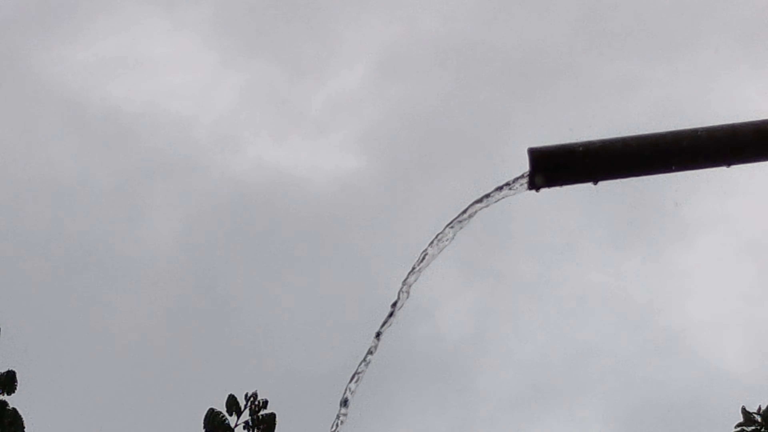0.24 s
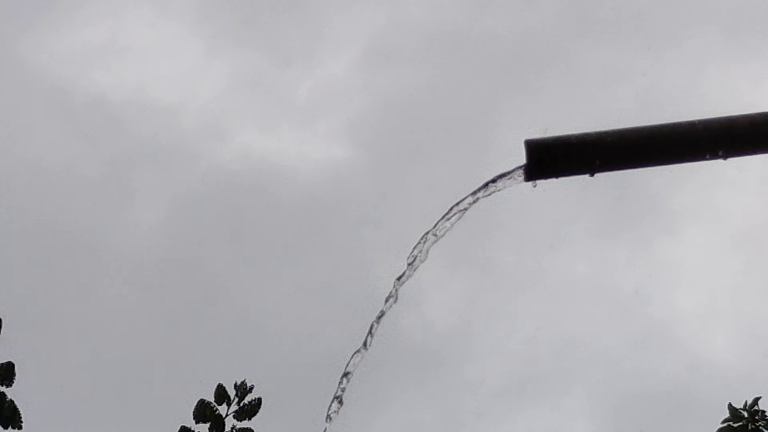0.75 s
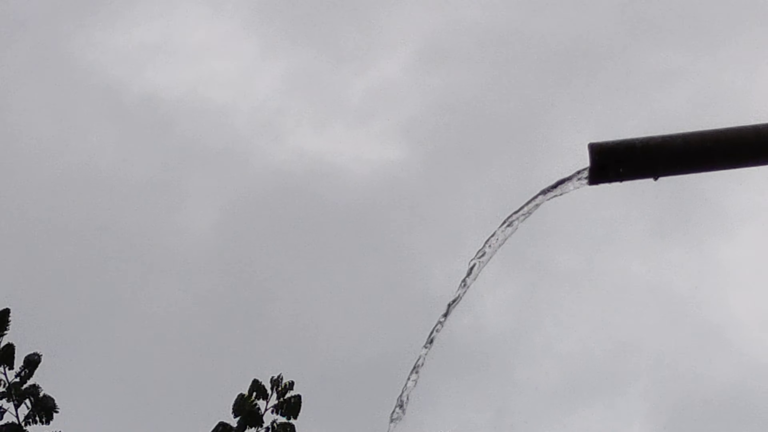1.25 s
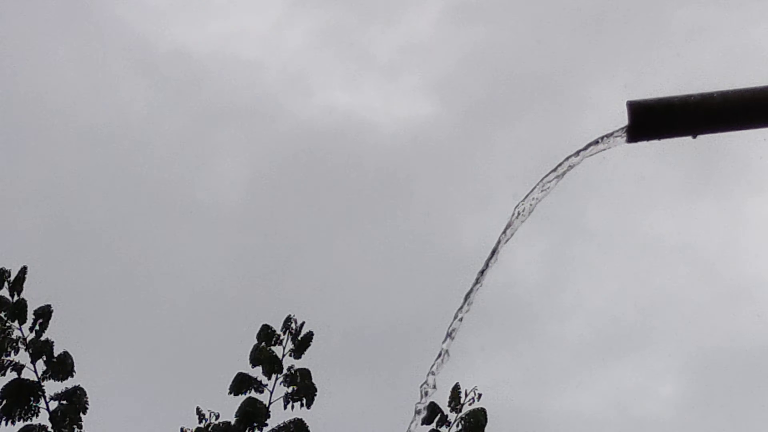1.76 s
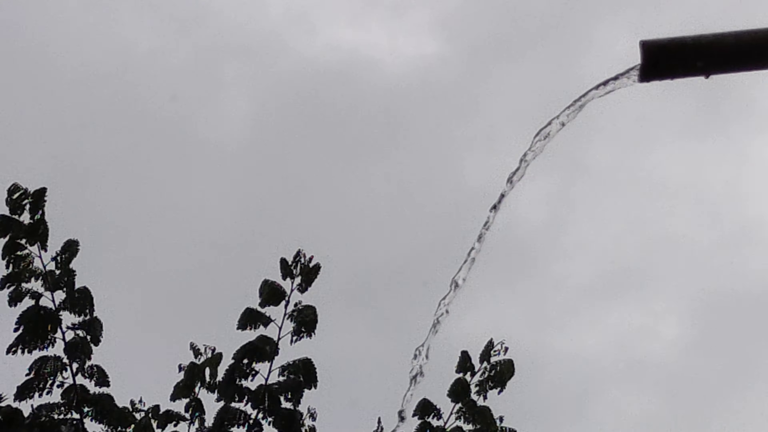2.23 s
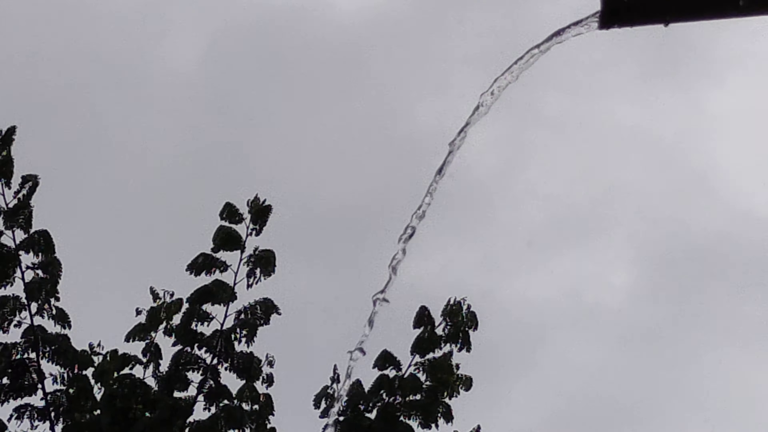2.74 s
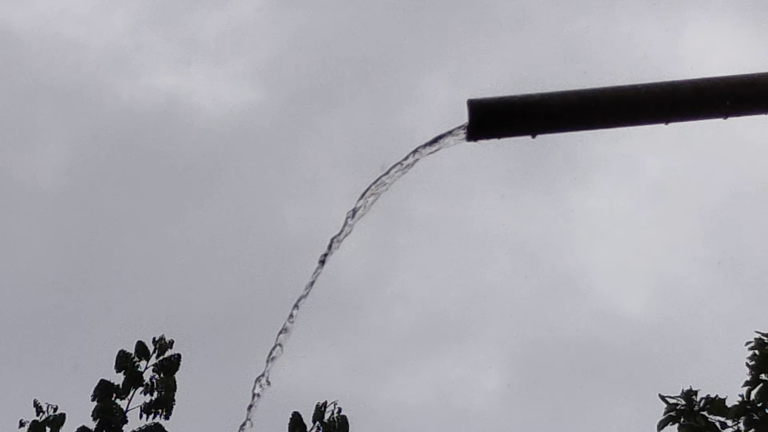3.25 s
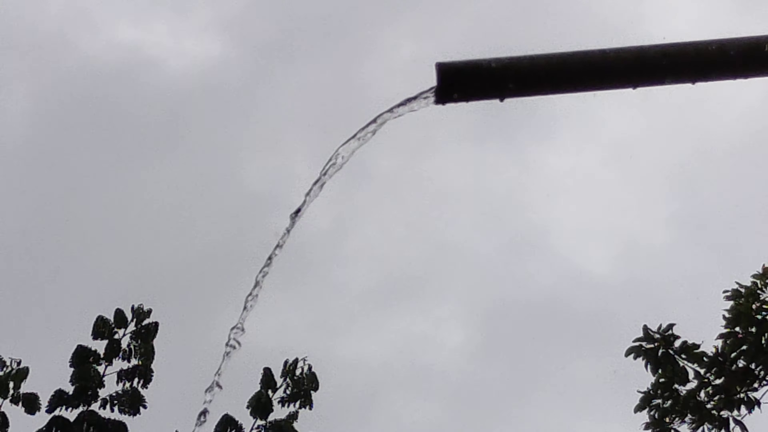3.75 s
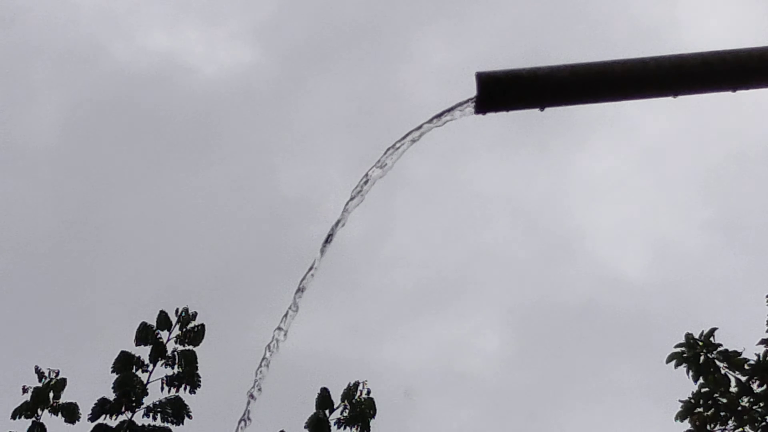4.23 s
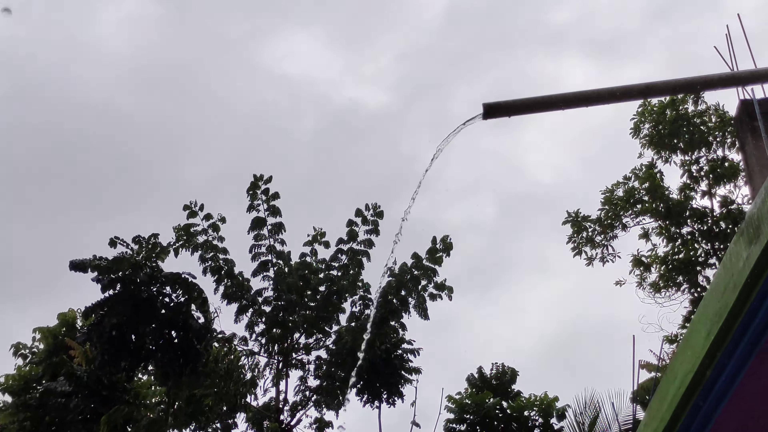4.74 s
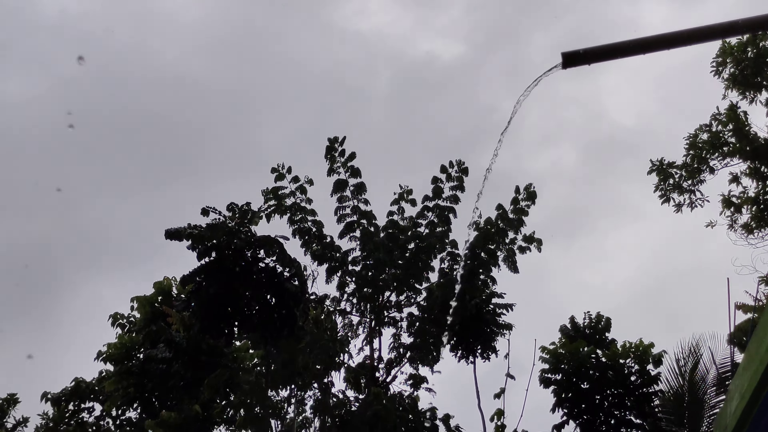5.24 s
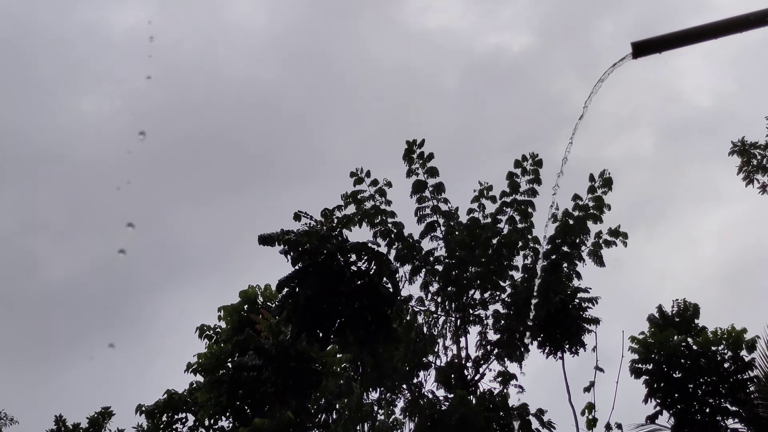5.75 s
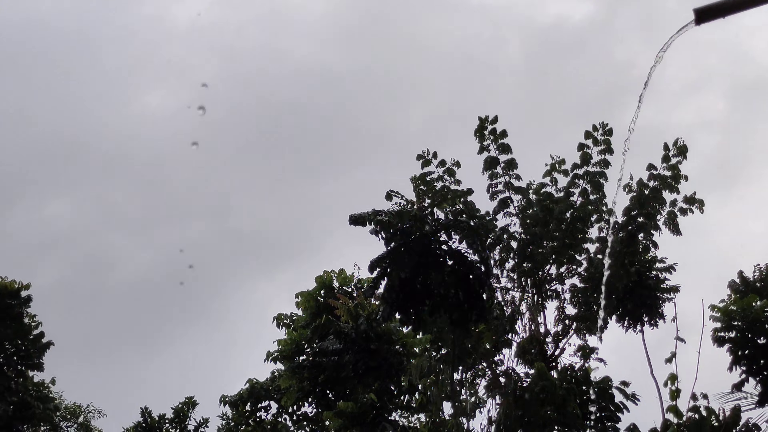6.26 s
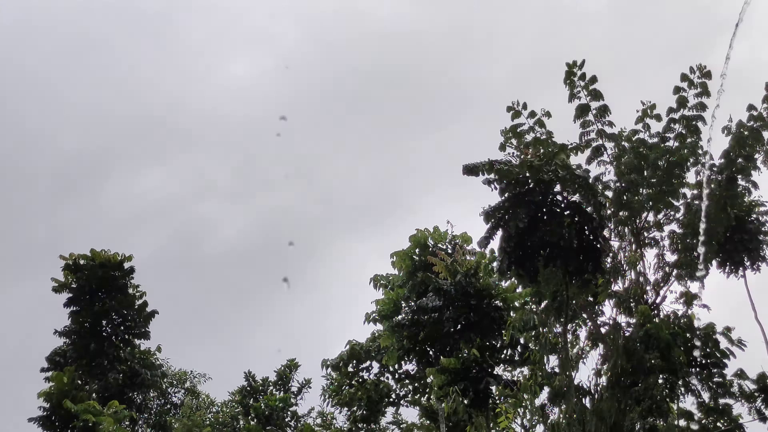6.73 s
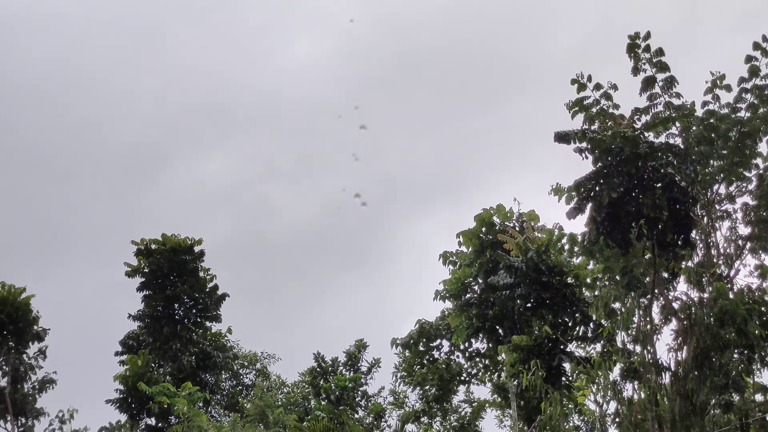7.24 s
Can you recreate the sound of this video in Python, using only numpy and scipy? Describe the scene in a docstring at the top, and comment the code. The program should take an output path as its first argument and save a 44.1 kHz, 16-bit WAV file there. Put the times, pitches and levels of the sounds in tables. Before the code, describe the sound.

Wet drops smack and patter on leaves beside a pouring drain, growing denser, with plopping puddles, dull drumming drips and a late falling bird whistle.

```python
"""Steady rain in a garden beside a house: from the start, bursts of band-limited noise and short wave packets
give drops smacking on leaves and wet ground, while a roof drain pours and spatters.
Fat drips soon plop into puddles as ringing air bubbles, and the pool gurgles, splashes and bubbles.
From halfway, runs of drips drum on a taut cover overhead (perhaps an umbrella), each a rounded push.
Near the end a bird gives one long falling whistle, a swept sine. The house wall throws back short echoes."""
import sys
import numpy as np
from scipy import signal
from scipy.fft import rfft, irfft
from scipy.io import wavfile
from scipy.ndimage import uniform_filter1d

SR = 44100
rng = np.random.default_rng(int(sys.argv[2]) if len(sys.argv) > 2 else 0)


def store_wav(level_fs):
    """Save 16-bit WAV to argv[1]."""
    pcm = np.round(np.clip(np.atleast_2d(level_fs), -1, 1) * 32767)
    wavfile.write(sys.argv[1], SR, pcm.T.astype(np.int16))


N = 330292
TIME = np.arange(N) / SR

# fine rain on the leaves, before mixing: (time [s], relative level [dB])
RAIN_LEVEL = [(0.0, -39), (0.16, -54), (0.31, -62), (0.73, -39), (0.96, -52), (1.11, -49), (1.31, -51),
              (1.4, -46), (2.13, -35), (2.27, -31), (2.9, -36.5), (4.07, -35), (4.9, -37), (5.09, -36.5),
              (5.25, -37), (5.59, -37), (5.74, -48), (6.01, -46), (6.32, -38.5), (6.53, -41.5), (6.74, -47),
              (6.92, -36.5), (7.2, -43), (7.49, -39)]
# centre pitch of the rain at the start [Hz] and its steady fall [Hz per s]
RAIN_HZ, RAIN_SAG_HZ_PER_S = 3298, 96
# spray of the drain, before mixing: (time [s], relative level [dB])
SPRAY_LEVEL = [(0.0, -71.5), (0.31, -64.5), (0.58, -65), (0.77, -54.5), (0.98, -67.5), (1.15, -55),
               (1.79, -53.5), (1.96, -45), (2.06, -64), (2.23, -41), (2.56, -45), (2.61, -47), (2.71, -51),
               (3.23, -53), (3.38, -70.5), (3.42, -41.5), (3.52, -55.5), (3.54, -50), (3.67, -48),
               (3.84, -32.5), (4.42, -41), (4.53, -56.5), (4.61, -40), (4.75, -67), (5.01, -44),
               (5.57, -49), (5.59, -31.5), (5.7, -49.5), (5.78, -38), (5.84, -51), (6.28, -49),
               (6.38, -42.5), (6.63, -64), (6.84, -33), (7.03, -60), (7.49, -43)]
# pitch around which the spray ticks most: (time [s], frequency [Hz])
SPRAY_PITCH = [(0, 6900), (0.7, 6860), (1.5, 7470), (2.3, 7350), (2.7, 8040), (2.95, 6350), (3.2, 6670),
               (3.5, 7200), (3.7, 6130), (4.05, 6100), (4.2, 6560), (4.4, 5640), (5.0, 6700), (5.8, 7300),
               (6.5, 6350), (6.85, 6380), (7.49, 5300)]
# bands in which the spray ticks: (centre [Hz], width [Hz], relative level [dB])
TICK_BANDS = [(4548, 310, 1), (5202, 530, -1.5), (6370, 280, -4), (6792, 200, -4.5), (7660, 270, -5)]
# distance from the spray pitch at which the amplitude of a tick band is halved [Hz]
SPRAY_REACH_HZ = 1550
# big drops close by: (time [s], relative level [dB], centre [Hz], width [Hz], spray relative to the smack [dB])
DROPS = [(0.088, -27.5, 3220, 1130, -29), (0.14, -27.5, 3000, 820, -42), (0.1844, -20.5, 3270, 790.0, -34),
         (0.194, -26.5, 3250, 1020, -32), (0.2146, -23.5, 3220, 1000, -13.5),
         (0.249, -25.5, 3540, 1120, -24), (0.2814, -21, 3670, 679, -21.5), (0.3083, -19, 3240, 1360.0, -19),
         (0.322, -23, 2910, 1140, -10), (0.345, -24.5, 3530, 1000, -14), (0.4687, -24, 3280, 1000, -39),
         (0.479, -25.5, 3310, 1150, -38), (0.5185, -11, 2760, 1870, -31), (0.598, -23.5, 3160, 810, -43),
         (0.6759, -18, 2800, 1610.0, -23), (0.791, -23.5, 2940, 1900, -12), (0.806, -23, 3270, 1170, -24),
         (0.8537, -16, 2980, 1230, -17), (0.9613, -22, 2474, 940, -47), (0.9968, -24, 3720, 760, -19),
         (1.1209, -14.5, 2600, 2780, -23), (1.1403, -29, 2320, 1500, -12.5),
         (1.169, -27.5, 3120, 2670, -13), (1.1893, -17, 2720, 2380, -33),
         (1.2189, -21, 3320, 1370.0, -17.5), (1.2572, -31, 2110, 1150, -44),
         (1.278, -15.5, 2740, 1480.0, -16), (1.293, -24, 2570, 1360, -28), (1.3356, -14, 2500, 1120, -39),
         (1.3632, -17, 3440, 1370.0, -28.5), (1.4151, -21.5, 3266, 900, -19.5), (1.44, -23, 3050, 830, -42),
         (1.4578, -16.5, 2950, 690.0, -18.5), (1.522, -25, 3230, 1260, -36),
         (1.5916, -14.5, 3120, 1270.0, -33), (1.6361, -8.5, 3250, 980, -27),
         (1.6518, -17.5, 3120, 1050.0, -17.5), (1.6697, -16.5, 2690, 690.0, -57),
         (1.7211, -16, 3080, 690.0, -44), (1.7382, -12.5, 2620, 1160, -24.5),
         (1.808, -19.5, 2940, 930, -30), (1.8472, -17.5, 3270, 1690.0, -18),
         (1.8947, -12, 3400, 690.0, -20), (1.9301, -17.5, 3230, 924, -13),
         (1.951, -16.5, 3100, 930.0, -13.5), (2.1002, -18, 3000, 1200, -37), (2.117, -19, 3260, 1460, -41),
         (2.1314, -15, 2830, 1060.0, -57), (2.1445, -11, 2920, 695, -32), (2.1594, -16, 3070, 1220.0, -20),
         (2.1935, -6.5, 2580, 1690, -22), (2.2169, -12, 3350, 1320.0, -12), (2.2427, -22, 3140, 1580.0, -9),
         (2.2788, -5.5, 2850, 2440, -27), (2.2805, -10.5, 3100, 2450, -18),
         (2.3229, -13, 2920, 1130.0, -16), (2.3532, -8, 2520, 1400.0, -47), (2.364, -21, 3360, 1820, -9.5),
         (2.3968, -8, 2980, 1480, -17.5), (2.44, -27, 3114, 1670, -34), (2.5332, -13, 2800, 1200, -14),
         (2.584, -18.5, 2770, 1033, -30), (2.5978, -11, 2640, 1450.0, -11.5),
         (2.6201, -17.5, 2750, 790.0, -5.5), (2.8227, -17, 3020, 1630, -17), (2.8406, -19, 2705, 1017, -26),
         (2.8953, -19, 2310, 970.0, -38), (2.9244, -18, 2770, 960.0, -50), (2.936, -20, 2770, 1270, -16),
         (3.09, -17, 3020, 1180, -15), (3.144, -15.5, 3000, 1560, -47), (3.1544, -22, 2920, 1190, -37),
         (3.181, -15.5, 2960, 1260, -15), (3.2028, -10.5, 2670, 1230, -23.5), (3.251, -19, 2970, 1840, -18),
         (3.2774, -13, 2540, 1350, -25.5), (3.385, -19.5, 2700, 1130, -35), (3.418, -17.5, 2670, 1510, -18),
         (3.4707, -17, 2720, 1300, -18.5), (3.502, -18.5, 2960, 1020, -15), (3.514, -33, 3070, 1110, -23),
         (3.5645, -18.5, 3000, 980.0, -15), (3.6153, -14.5, 2930, 1110, -29.5),
         (3.712, -11.5, 2580, 686, -48), (3.726, -15.5, 2700, 690.0, -38),
         (3.7661, -17.5, 2564, 890.0, -25), (3.8595, -16.5, 2470, 690.0, -40),
         (3.8898, -15.5, 2720, 850.0, -37), (3.9071, -13, 2700, 1120, -39),
         (3.9266, -17.5, 2350, 2050, -18), (4.002, -18.5, 2650, 1470, -17), (4.018, -18.5, 2460, 1200, -26),
         (4.09, -22, 2960, 1750, -26), (4.1692, -16, 2714, 1000.0, -13.5), (4.2021, -13, 2750, 1015, -19),
         (4.2234, -31, 2650, 1280.0, -14), (4.236, -20, 2680, 1100, -21), (4.2659, -18, 2720, 960.0, -22),
         (4.3056, -11.5, 2700, 870, -21), (4.334, -17.5, 2900, 1330, -21), (4.3676, -26, 2760, 1370, -27),
         (4.3867, -15.5, 2800, 850.0, -20), (4.458, -10.5, 2570, 1310, -23),
         (4.6041, -11, 3010, 1170.0, -23), (4.6352, -20.5, 2570, 1320.0, -8.5),
         (4.6549, -14.5, 2620, 1140.0, -25), (4.687, -22, 2800, 1200, -16), (4.719, -19, 2800, 1570, -26),
         (4.8461, -13.5, 2580, 3060, -20.5), (4.8901, -12.5, 3000, 1310.0, -34),
         (4.8974, -14.5, 2950, 1300, -26), (4.913, -21, 2780, 950, -30), (4.9467, -16, 2700, 700.0, -17.5),
         (4.9735, -18, 2850, 1200, -18), (4.9831, -10.5, 2990, 1490, -27), (5.0008, -15, 3117, 1950.0, -40),
         (5.013, -20, 2810, 990, -31), (5.0316, -9.5, 2520, 1430.0, -22.5), (5.063, -16, 2780, 1640.0, -39),
         (5.0808, -14, 2980, 1520.0, -21), (5.09, -29, 2850, 1430, -23), (5.154, -16.5, 2470, 1070, -32),
         (5.1715, -15.5, 2940, 2000, -45), (5.2424, -14.5, 2740, 1690, -31), (5.254, -21, 2920, 1920, -24),
         (5.275, -14, 2650, 1700, -33), (5.2876, -14.5, 2900, 1670.0, -17), (5.3381, -14, 3060, 1600, -18),
         (5.4184, -10.5, 2100, 1530, -28), (5.431, -19.5, 2790, 1700, -33),
         (5.4431, -17, 2480, 1110.0, -28.5), (5.47, -17, 2600, 990, -34),
         (5.4807, -14.5, 2010, 2010.0, -42), (5.5099, -16, 2630, 840.0, -15.5),
         (5.528, -18.5, 2520, 1110, -34), (5.56, -10, 2210, 1670.0, -28), (5.5861, -15, 2600, 1690.0, -26),
         (5.601, -10, 2610, 1890, -21.5), (5.615, -13, 3020, 1620, -40), (5.6276, -10, 2880, 1700, -33),
         (5.6471, -27, 3020, 1530, -12), (5.6815, -19, 3400, 1100, -14), (5.6898, -22, 2740, 1400, -32),
         (5.6577, -10.5, 2930, 1890, -25), (5.6987, -12.5, 2550, 1140, -33), (5.7256, -18, 3050, 1300, -19),
         (5.7342, -10.5, 2600, 1560.0, -17.5), (5.7665, -4.5, 2620, 2030.0, -22),
         (5.7833, -24, 2850, 1900.0, -35), (5.825, -16.5, 2360, 1310, -40), (5.87, -16, 2480, 1240, -37),
         (5.884, -19, 2440, 1650, -30), (5.9039, -13.5, 2300, 1570, -32), (5.927, -25, 2930, 1810, -35),
         (5.947, -19.5, 2680, 730, -15.5), (6.0488, -16, 2420, 1460, -20), (6.1015, -12, 2430, 2550, -36),
         (6.2514, -10.5, 2582, 2560, -23), (6.3403, -9.5, 3030, 1840, -25),
         (6.3704, -7.5, 2770, 1990, -35.5), (6.3921, -12.5, 3020, 2770, -18),
         (6.7595, -24, 2440, 3500, -9.5), (6.7815, -13.5, 2455, 1500.0, -35),
         (6.8364, -11.5, 2170, 1550.0, -17), (6.8577, -30.5, 2600, 2700, -30),
         (6.895, -17, 3520, 1970, -21), (6.9262, -12.5, 2490, 1960, -28), (7.3365, -9.5, 2060, 2570, -30.5),
         (7.4079, -11, 2800, 2280.0, -26)]
# droplets thrown off by a smack: (typical delay [s], mean level relative to the smack [dB])
REBOUNDS = [(.0013, -8), (.0022, -6.5), (.0039, -10.5)]
# lesser drops: mean height above RAIN_LEVEL and its spread [dB], median width [Hz], mean spray [dB]
LESSER_DB, LESSER_SPREAD_DB, LESSER_WIDTH_HZ, LESSER_SPRAY_DB = 13, 1, 900, -15
# gushes that shatter on the leaves: (time [s], relative level [dB], centre [Hz], width [Hz])
SPATTERS = [(0.182, -54, 4870, 1800), (0.282, -53, 4740, 1700), (0.324, -65, 6700, 1500),
            (0.677, -58, 4870, 1400), (0.745, -46.5, 6450, 1100), (1.276, -53, 6200, 1880),
            (1.591, -47, 4950, 1500), (2.6, -64, 6840, 1410), (3.18, -54, 6400, 1090),
            (3.414, -47, 6800, 1590), (3.543, -42.5, 6100, 1460), (3.914, -51, 6540, 1090),
            (4.633, -58, 6150, 2200), (6.045, -54, 7100, 1400), (6.276, -53.5, 5500, 1800),
            (6.305, -51, 5850, 1800), (6.713, -56, 6350, 1313), (6.794, -58, 6630, 1100),
            (7.212, -62, 6360, 1800), (7.425, -51, 5140, 1500)]
# fat drips into puddles and on broad leaves: (time [s], relative level [dB], pitch [Hz])
PLOPS = [(0.519, -55.5, 323), (0.52, -38.5, 1900), (0.72, -58, 352), (0.938, -52.5, 335),
         (1.119, -30.5, 1934), (1.121, -44, 1150), (1.187, -42, 1830), (1.257, -35.5, 1830),
         (1.28, -41, 382), (1.338, -44, 370), (1.458, -45, 438), (1.459, -58, 604), (1.524, -40.5, 336),
         (1.629, -50.5, 328), (1.675, -48.5, 1280), (1.694, -48, 1120), (1.695, -55, 587),
         (1.714, -46.5, 1150), (1.847, -42, 1720), (1.848, -54, 1140), (1.955, -40.5, 334),
         (2.079, -56, 900), (2.194, -34, 1830), (2.269, -58, 346), (2.281, -35, 1375), (2.28, -52.5, 894),
         (2.82, -49.5, 1217), (2.958, -40, 1620), (2.985, -49, 1300), (3.028, -46.5, 343),
         (3.098, -42, 335), (3.21, -44.5, 1320), (3.27, -54, 644), (3.478, -40, 340), (3.911, -38, 857),
         (3.958, -32.5, 920), (3.988, -47, 290), (4.124, -36, 1357), (4.231, -40, 323), (4.31, -38.5, 330),
         (4.433, -46.5, 333), (4.498, -46.5, 325), (4.562, -44, 350), (4.606, -42, 1330), (4.642, -44, 350),
         (4.815, -31.5, 1180), (4.817, -38.5, 894), (4.89, -50.5, 510), (4.959, -40, 438),
         (5.0, -47.5, 900), (5.039, -39.5, 326), (5.183, -49, 358), (5.219, -51, 496), (5.26, -58, 1270),
         (5.342, -45, 330), (5.888, -34.5, 370), (6.194, -46.5, 340), (6.255, -35.5, 344),
         (6.28, -37, 1060), (6.30, -41.5, 800), (6.318, -52.5, 560), (6.343, -39, 322), (6.443, -39.5, 980),
         (6.444, -42, 320), (6.446, -45, 606), (6.721, -43.5, 334), (6.791, -41, 319), (6.819, -38.5, 925),
         (6.836, -25, 1790), (6.838, -48, 560), (6.858, -36, 333), (6.915, -35.5, 332), (7.321, -34, 340),
         (7.334, -27.5, 983), (7.336, -22.5, 1582), (7.391, -48, 327)]
# faint low hum: (time [s], level [dB])
HUM_LEVEL = [(.5, -88), (.9, -78), (1.35, -66), (1.7, -86.5), (2.25, -72), (2.65, -83), (3.0, -92)]
# low gurgle of the pool before drips stir it: (time [s], level [dB])
GURGLE_LEVEL = [(0.0, -73.5), (1.23, -72.5), (1.46, -69), (1.75, -73.5), (3.35, -68), (3.6, -60.5),
                (3.8, -64), (4.1, -59), (4.3, -56), (4.58, -56), (4.75, -65.5), (5.49, -58), (5.63, -41),
                (5.74, -42.5), (6.15, -56), (6.3, -54), (6.45, -43.5), (6.6, -70), (6.69, -70), (6.77, -40),
                (6.92, -60), (7.05, -63), (7.2, -59.5), (7.49, -59)]
# water splashing on the ground before drips stir it: (time [s], level [dB])
SPLASH_LEVEL = [(0.0, -70.5), (2.11, -83), (2.4, -50), (2.65, -67), (3.11, -59), (3.55, -72), (3.85, -64),
                (3.97, -43.5), (4.1, -68), (4.23, -47), (4.33, -74), (4.57, -57.5), (4.84, -49),
                (5.36, -62.5), (5.59, -47), (5.9, -46), (6.03, -45), (6.63, -54), (6.8, -37), (7.05, -48.5),
                (7.49, -52.5)]
# hollow in the pool that bubbles at one pitch: (time [s], level [dB])
BUBBLING_LEVEL = [(0, -92), (2.1, -83), (2.4, -64), (2.8, -78), (3.3, -70), (3.42, -58), (3.7, -64),
                  (3.8, -76), (3.95, -48.5), (4.1, -71), (4.31, -48), (4.48, -78), (4.66, -60),
                  (4.76, -75.5), (5.35, -61), (5.6, -45.5), (6.18, -67.5), (6.33, -53.5), (6.6, -89),
                  (6.87, -48.5), (7.03, -63.5), (7.49, -67)]
# drips on the taut cover, a longer contact being duller: (time [s], relative level [dB], contact scale [s])
THUDS = [(3.584, -56, .0009), (3.623, -48, 0.00058), (4.060, -46, 0.00051), (4.1404, -40.5, 0.00051),
         (4.2, -42.5, 0.00023), (4.272, -42.5, 0.00035), (4.311, -41, 0.00056), (4.338, -45, 0.00054),
         (4.435, -44, 0.0009), (4.468, -43, 0.00076), (4.506, -45, 0.0012), (4.547, -42.5, .0011),
         (4.573, -44, 0.00084), (5.4037, -39, 0.000032), (5.4798, -41, .00006), (5.4884, -37.5, .0001),
         (5.4954, -35.5, .00007), (5.5031, -38, .00007), (5.5187, -35, 0.000064), (5.5273, -41, .0001),
         (5.5928, -34.5, 0.00005), (5.6016, -34, 0.000081), (5.6082, -35, .00008), (5.6155, -34, .00006),
         (5.6254, -36, 0.000079), (5.6422, -35, 0.00011), (5.6925, -36, .00007), (5.709, -36, 0.000076),
         (5.723, -40, .00007), (5.735, -35.5, .00008), (5.7510, -36.5, .0001), (5.846, -42, 0.00037),
         (5.8627, -37.5, 0.00033), (5.9216, -40, 0.00013), (5.9369, -34, 0.00028), (5.9629, -34.5, 0.00024),
         (5.9786, -35, 0.00024), (6.0415, -37.5, 0.00013), (6.0588, -37.5, .00007), (6.383, -39, .00005),
         (6.3963, -36.5, .00008), (6.414, -38.5, .00006), (6.7583, -45, .00005), (6.7736, -38.5, 0.000062),
         (7.0996, -44, .00003), (7.1110, -40.5, .00003), (7.1192, -43, .00003), (7.134, -39, .00003)]
# the bird's pitch [Hz], its hold [s], then its fall, ever faster [Hz per s squared]
BIRD_HZ, BIRD_HOLD_S, BIRD_FALL_HZ_PER_S2 = 4668, 0.09, 2650
# the whistle's start and length [s], attack and release [s], level at the start [dB], fading [dB per s]
BIRD_START_S, BIRD_LENGTH_S, BIRD_ATTACK_S, BIRD_RELEASE_S = 6.383, .615, .012, .075
BIRD_DB, BIRD_FADE_DB_PER_S = -39.7, 20
# reflections from ground and house wall: (delay [s], level [dB])
ECHOES = [(.0088, -49), (0.017, -21), (0.0332, -13.5), (.041, -35.5)]
# colour of the smacks of drops and beads: (frequency [Hz], gain [dB])
SMACK = [(500, -24), (1200, -6.5), (1900, -6.5), (2400, -6.5), (3000, -2.5), (3350, -9), (3880, 1),
         (4200, -9.5), (4600, 1), (5200, -25.5), (8000, -8)]
# colour of the fine rain: (frequency [Hz], gain [dB])
PATTER = [(1000, -50.5), (1750, -42), (2150, 30), (2900, 8), (3300, -6), (3850, 8), (4200, -16), (4600, 11),
          (5200, -29.5), (8000, -25)]
# colour of the stream's high ticks: (frequency [Hz], gain [dB])
SPRAY = [(2350, -37), (4000, -3), (4170, -18.5), (4440, -9.5), (4690, -10.5), (4950, -12.5), (5220, -13.5),
         (5820, -0.5), (6080, -2.5), (6440, -6.5), (7000, -1.5), (7500, -15), (7930, -15), (8300, -31),
         (10800, -71), (18300, -120)]
# colour of the drips in puddles: (frequency [Hz], gain [dB])
PUDDLE = [(200, -2.5), (330, -0.5), (430, -2), (600, 6), (760, -5), (930, 5.5), (1060, -2), (1220, 9.5),
          (1450, -13), (1650, 0), (2200, 10)]
# colour of the gurgling pool: (frequency [Hz], gain [dB])
GURGLE = [(60, -22), (150, -7.5), (250, -1.5), (340, 9.5), (430, -0.5), (560, -1.5), (720, -10.5),
          (1400, -52)]
# colour of the water splashing on the ground: (frequency [Hz], gain [dB])
SPLASH = [(400, -31), (700, -22.5), (930, -7), (1100, 1), (1270, 10.5), (1450, -26.5), (1630, 19),
          (1900, 0), (2200, 11), (2500, 10), (3150, -14.5), (3530, 18.5), (3900, -36), (4500, -59)]
# colour of the taut cover: (frequency [Hz], gain [dB])
COVER = [(40, -22.5), (75, 2.5), (125, 8.5), (190, 5.5), (330, 1.5), (550, 7), (730, -2), (920, 8),
         (1300, 5.5), (1800, -1), (3000, -23), (7000, -47.5)]
# colour of the background air: (frequency [Hz], gain [dB])
AIR = [(20, -8.5), (50, -7), (90, -2.5), (150, -7.5), (400, -12.5), (900, -7.5), (2000, -17.5), (8000, -33)]


def undb(db):
    """Amplitude ratio: 20 dB is a factor of ten."""
    return 10 ** (np.asarray(db) / 20)


def curves(table):
    """Linear interpolation: each column of a table is joined by straight lines in time."""
    s, *columns = np.transpose(table)
    return [np.interp(TIME, s, c) for c in columns]


def add(out, s, sound):
    """Superposition: a short sound is summed in at time s."""
    i = int(np.clip(s * SR, 0, N - 1))
    out[i:i + len(sound)] += sound[:N - i]


def colour(x, points, size=4096):
    """Minimum-phase filtering: folding the cepstrum makes a causal response from (Hz, dB) points."""
    hz, db = np.transpose(points)
    grid = np.maximum(np.fft.rfftfreq(size, 1 / SR), 1)
    gain_db = np.interp(np.log(grid), np.log(hz), db)
    cepstrum = irfft(np.log(undb(gain_db)))
    cepstrum[1:size // 2] *= 2
    cepstrum[size // 2 + 1:] = 0
    response = irfft(np.exp(rfft(cepstrum)))
    return signal.fftconvolve(x, response)[:len(x)]


def steady(x, size=5000):
    """Level normalisation: division by the running rms (size in samples) leaves only the fine grain."""
    return x / np.sqrt(np.maximum(uniform_filter1d(x * x, size), 1e-18))


def walk(rate_hz, size=2000):
    """Slow random modulation: normal values at rate_hz joined by lines, with a spread near 1."""
    return 1.2 * np.interp(TIME * rate_hz, np.arange(size), rng.standard_normal(size))


def crackle(rate, spread_db, wash):
    """Shot noise: random impacts (rate per s), a few far bigger, over a wash of distant ones."""
    size = undb(spread_db * np.minimum(rng.exponential(size=N), 4))
    hits = (rng.random(N) < rate / SR) * size * rng.choice([-1, 1], N)
    return hits / np.std(hits) + wash * rng.standard_normal(N)


def hiss(hz, width_hz):
    """Band-limited noise: a band-pass on shot noise, scaled to an rms of 1."""
    band = signal.butter(2, [hz - width_hz / 2, hz + width_hz / 2], "band", fs=SR, output="sos")
    x = signal.sosfilt(band, crackle(rate=790, spread_db=6.0, wash=0.87))
    return x / np.std(x)


def tail(x, t60):
    """Diffuse reverberation: convolution with decaying noise of unit energy, 60 dB down after t60 seconds."""
    t = TIME[:SR // 2]
    decay = np.exp(-np.log(1000) * t / t60)
    response = rng.standard_normal(len(t)) * decay * (1 - np.exp(-t / 0.0012))
    return signal.fftconvolve(x, response / np.linalg.norm(response))[:N]


def yard(x, tail_db, t60):
    """Reflection: direct sound, delayed copies from hard surfaces, and a short diffuse tail."""
    echoes = sum(undb(db) * np.interp(TIME - lag, TIME, x, left=0) for lag, db in ECHOES)
    return x + echoes + undb(tail_db) * tail(x, t60)


def air():
    """Broadband ambience: coloured noise held at a constant level."""
    return undb(-69) * steady(colour(rng.standard_normal(N), AIR))


def rain_hz(s):
    """Linear drift: the rain grows duller as its centre pitch falls steadily with time s."""
    return RAIN_HZ - RAIN_SAG_HZ_PER_S * s


def smack(hz, width_hz, phase, swell_s, count=4):
    """Wave packet: a few cycles swell and die within one band; also gives the time to its peak."""
    half = int(count * swell_s * SR / 2)
    t = np.arange(-half, half) / SR
    envelope = np.sinc(width_hz * t) * np.exp(-(t / swell_s) ** 2)
    return envelope * np.cos(2 * np.pi * (hz * t + phase)), -t[0]


def patter(centre_hz, spread_db, scatter, width_hz, swell_s, ring_db, count):
    """Random superposition: small drops, a few far bigger, around a moving pitch; some click, some ring."""
    out = np.zeros(N)
    for when, phase, chance, pitch, soft in rng.random((count, 5)):
        i = int(when * N)
        size = undb(-spread_db * np.log(chance + 0.11))
        longer = undb(ring_db * (2 * soft - 1))
        hz = centre_hz[i] * (1 + scatter * (2 * pitch - 1))
        hit, rise = smack(hz, width_hz / longer, phase, swell_s * longer)
        add(out, i / SR - rise, size * hit / np.sqrt(longer))
    return steady(colour(out, PATTER))


def stream(gap_s, uneven, spread_db, scatter, burst_s, width_hz, swell_s, count=600, size=6):
    """Jet break-up: beads of the falling stream land one by one, each a soft pat and a burst of high ticks."""
    pats, ticks, centre_hz = np.zeros(N), np.zeros(N), curves(SPRAY_PITCH)[0]
    late, louder = rng.standard_normal((count, 2)).T
    landings = np.cumsum(gap_s * np.exp(uneven * late))
    for s, db in zip(landings, spread_db * louder):
        if s > TIME[-1]:
            break
        for k, (lag, pitch, phase) in enumerate(rng.standard_normal((size, 3))):
            # the first two fragments pat low, the smaller ones tick high
            layer, hz = (pats, rain_hz(s)) if k < 2 else (ticks, centre_hz[int(s * SR)])
            hit, rise = smack(hz * (1 + scatter * pitch), width_hz, phase, swell_s)
            add(layer, s - rise + burst_s * lag, undb(db) * hit)
    return colour(pats, SMACK), colour(ticks, SPRAY)


def ticking(drive, drift_db, drift_hz):
    """Resonance: spray rings in a few high bands, most near its pitch, each swelling and fading by itself."""
    out, power, centre_hz = 0, 0, curves(SPRAY_PITCH)[0]
    for hz, width_hz, db in TICK_BANDS:
        band = signal.butter(1, [hz - width_hz / 2, hz + width_hz / 2], "band", fs=SR, output="sos")
        nearness = 1 / (1 + ((hz - centre_hz) / SPRAY_REACH_HZ) ** 2)
        gain = undb(db + drift_db * walk(drift_hz)) * nearness
        out = out + gain * signal.sosfilt(band, signal.sosfilt(band, drive))
        power = power + gain ** 2
    return out / np.sqrt(power)


def mist(mist_db, follow, flicker_db):
    """Dense shot noise: tiny droplets hiss in the treble, swelling a little with the drain's spray."""
    spray_db = curves(SPRAY_LEVEL)[0]
    db = mist_db + follow * (spray_db - spray_db.mean()) + flicker_db * walk(9.2)
    droplets = ticking(crackle(rate=1500, spread_db=4, wash=.5), drift_db=3, drift_hz=16)
    return undb(db) * steady(droplets)


def lesser_drops(scatter, count):
    """Random arrivals: rows like those of DROPS, whose strength and pitch follow the fine rain."""
    s = rng.random(count) * N / SR
    size, pitch, wet = rng.standard_normal((count, 3)).T
    db = np.interp(s, *np.transpose(RAIN_LEVEL)) + LESSER_DB + LESSER_SPREAD_DB * size
    hz = rain_hz(s) * (1 + scatter * pitch)
    width_hz = LESSER_WIDTH_HZ * np.exp(0.62 * wet)
    return list(zip(s, db, hz, width_hz, LESSER_SPRAY_DB + 5 * wet))


def near_drops(drops, drop_db, spray_db, spray_s, scatter, swell_s, mist_db, mist_s):
    """Impact and fragmentation: a drop smacks, throws droplets, and bursts into a tick of spray and a mist."""
    body, fizz = np.zeros(N), np.zeros(N)
    t = TIME[:SR // 20]
    burst = (t / spray_s) ** 2 * np.exp(-2 * t / spray_s + 2) + undb(mist_db) * np.exp(-t / mist_s)
    for s, db, hz, width_hz, wet_db in drops:
        phase, chance = rng.random(4), rng.standard_normal((3, 3))
        hit, rise = smack(hz, width_hz, phase[0], swell_s)
        add(body, s - rise, undb(db + drop_db) * hit)
        for (lag, weaker_db), turn, (a, b, c) in zip(REBOUNDS, phase[1:], chance):
            # droplets are smaller than the drop, so on average they sound higher
            hit, rise = smack(1.03 * hz * (1 + scatter * a), width_hz, turn, swell_s)
            add(body, s - rise + lag * np.exp(0.31 * b), undb(db + drop_db + weaker_db + 2 * c) * hit)
        add(fizz, s - spray_s, undb(db + wet_db + spray_db) * burst * rng.standard_normal(len(t)))
    return colour(body, SMACK) + ticking(fizz, drift_db=3.5, drift_hz=11)


def spatters(spatter_db, attack_s, decay_s):
    """Atomisation: a gush shatters on the leaves into a brief swish of band-limited noise."""
    out, t = np.zeros(N), TIME[:SR // 4]
    envelope = (1 - np.exp(-t / attack_s)) * np.exp(-t / decay_s)
    for s, db, hz, width_hz in SPATTERS:
        add(out, s, undb(db + spatter_db) * envelope * hiss(hz, width_hz)[:len(t)])
    return out


def bubble(hz, cycles, glide, phase):
    """Bubble resonance: trapped air swells and rings out with rising pitch; also gives the time to its peak."""
    # age 1 is the peak
    age = np.arange(int(5 * cycles * SR / hz)) * hz / (cycles * SR)
    envelope = (age * np.exp(1 - age)) ** 2
    turns = cycles * age * (1 + glide * (age / 2 - 1)) + phase
    return envelope * np.cos(2 * np.pi * turns), cycles / hz


def plops(plop_db, cycles, glide, ring_cycles, scatter, slosh_db, slosh_s, count=7):
    """Air entrainment: a fat drip opens an air pocket; smaller bubbles ring as the water closes."""
    out = np.zeros(N)
    for s, db, hz in PLOPS:
        hit, rise = bubble(hz, cycles, glide, rng.random())
        add(out, s - rise, undb(db + plop_db) * hit)
        for when, pitch, phase in rng.random((count, 3)):
            hit, rise = bubble(hz * (1 + scatter * (pitch - .5)), ring_cycles, glide, phase)
            add(out, s + 1 / hz + slosh_s * when ** 2, undb(db + slosh_db - 13.0 * when) * hit)
    return colour(out, PUDDLE)


def hum():
    """Narrow-band noise: a faint low hum near 86 Hz comes and goes."""
    return undb(curves(HUM_LEVEL)[0]) * steady(hiss(hz=86, width_hz=26))


def stirred(level, hits, stir_db, settle_s):
    """Addition of power: churning water has its own level, raised by every hit (s, dB) and settling again."""
    power, t = undb(curves(level)[0]) ** 2, TIME[:SR // 2]
    envelope = (1 - np.exp(-t / 0.0017)) * np.exp(-t / settle_s)
    for s, db in hits:
        add(power, s, (undb(db + stir_db) * envelope) ** 2)
    return np.sqrt(power)


def gurgle():
    """Coloured shot noise: the pool gurgles low, stirred by deep drips and by those on the cover."""
    deep = [(s, db) for s, db, hz in PLOPS if hz <= 700]
    knocks = [(s, db) for s, db, contact_s in THUDS]
    grain = steady(colour(crackle(rate=130, spread_db=2.0, wash=0.68), GURGLE))
    return stirred(GURGLE_LEVEL, deep + knocks, stir_db=-21.5, settle_s=0.07) * grain


def splash():
    """Coloured shot noise: water splashes on the ground, stirred by sharp drips."""
    sharp = [(s, db) for s, db, hz in PLOPS if hz > 700]
    grain = steady(colour(crackle(rate=300, spread_db=7.5, wash=0.041), SPLASH))
    return stirred(SPLASH_LEVEL, sharp, stir_db=-8.5, settle_s=0.033) * grain


def bubbling():
    """Cavity resonance: a hollow in the pool bubbles at one pitch, made as narrow-band noise."""
    return undb(curves(BUBBLING_LEVEL)[0]) * steady(hiss(hz=922.5, width_hz=85))


def cover(thud_db, flap_db, flap_s):
    """Membrane excitation: a drip gives taut cloth one rounded push, then the cloth flutters briefly."""
    out, t = np.zeros(N), TIME[:SR // 8]
    for s, db, contact_s in THUDS:
        drive = undb(flap_db) * rng.standard_normal(len(t)) * np.exp(-t / flap_s)
        drive[0] = 1
        push = np.exp(-(t[:SR // 100] / contact_s - np.e) ** 2)
        thud = signal.fftconvolve(drive, push / push.sum())
        # the push peaks e contact scales after its start
        add(out, s - np.e * contact_s, undb(db + thud_db) * thud)
    return colour(out, COVER)


def bird(waver_hz, flutter_db, echo_db, echo_s):
    """Frequency modulation: one thin falling whistle wavers and flutters, smeared by the trees."""
    t = np.clip(TIME - BIRD_START_S, 0, BIRD_LENGTH_S)
    envelope = np.minimum(np.minimum(t / BIRD_ATTACK_S, (BIRD_LENGTH_S - t) / BIRD_RELEASE_S), 1)
    fall_hz = BIRD_FALL_HZ_PER_S2 * np.maximum(t - BIRD_HOLD_S, 0) ** 2
    phase = 2 * np.pi * np.cumsum(BIRD_HZ - fall_hz + waver_hz * walk(150)) / SR
    gain = undb(BIRD_DB - BIRD_FADE_DB_PER_S * t + flutter_db * walk(70))
    # the root of 2 gives the sine an rms of 1
    call = envelope * gain * np.sqrt(2) * np.sin(phase)
    return call + undb(echo_db) * tail(call, echo_s)


def scene():
    """Superposition of sources: near drops and drips in front of the fine rain and the churning pool."""
    # the smallest drops sound higher than the rest
    leaves = patter(1.212 * rain_hz(TIME), spread_db=4.5, scatter=0.085, width_hz=1390, swell_s=0.0013,
                    ring_db=4, count=3000)
    pats, ticks = stream(gap_s=.017, uneven=.33, spread_db=4, scatter=.11, burst_s=.0015,
                         width_hz=520, swell_s=.002)
    pats, ticks = (steady(yard(beads, tail_db=-5.5, t60=.26)) for beads in (pats, ticks))
    rain = undb(curves(RAIN_LEVEL)[0]) * (undb(-11) * leaves + undb(-12.5) * pats)
    spray = undb(curves(SPRAY_LEVEL)[0] - 6.5) * ticks
    spray = spray + mist(mist_db=-68.5, follow=0.21, flicker_db=3)
    spray = spray + spatters(spatter_db=7, attack_s=.001, decay_s=0.019)

    falling = list(DROPS) + lesser_drops(scatter=0.055, count=40)
    drops = near_drops(falling, drop_db=0.36, spray_db=11, spray_s=.0014, scatter=0.12, swell_s=0.0013,
                       mist_db=-5.5, mist_s=0.017)
    drips = plops(plop_db=3, cycles=1.7, glide=.025, ring_cycles=3.5, scatter=.5, slosh_db=-11.5, slosh_s=0.075)
    near = yard(drops, tail_db=-8.5, t60=0.29) + yard(drips, tail_db=-4.5, t60=0.29)

    pool = gurgle() + splash() + bubbling()
    drumming = cover(thud_db=35.5, flap_db=-38, flap_s=0.022)
    whistle = bird(waver_hz=25, flutter_db=2.6, echo_db=-6, echo_s=.25)
    return (air() + hum() + rain + spray + near + pool + drumming + whistle)[None]


def record(dry):
    """Low-pass filtering: a steep elliptic filter keeps only what lies below the high treble."""
    return signal.sosfilt(signal.ellip(8, .2, 60, 8350, fs=SR, output="sos"), dry)


dry = scene()
out = record(dry)
store_wav(out)
```